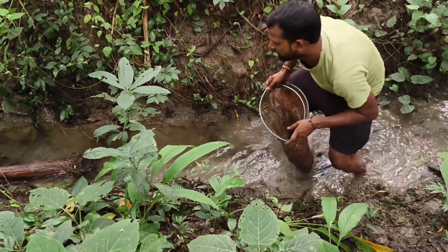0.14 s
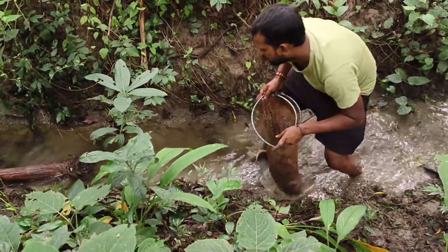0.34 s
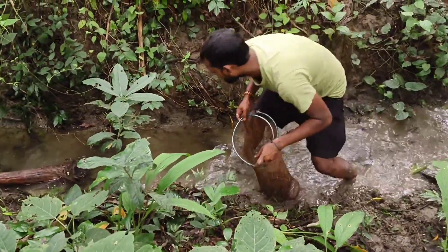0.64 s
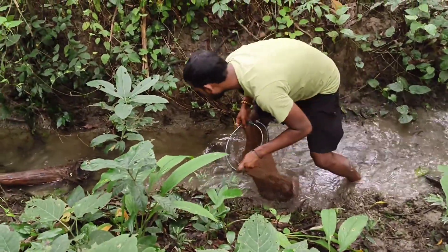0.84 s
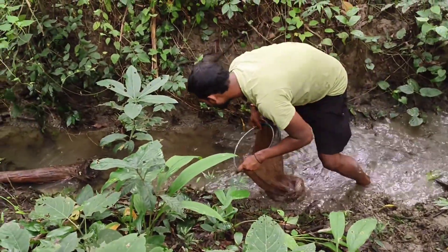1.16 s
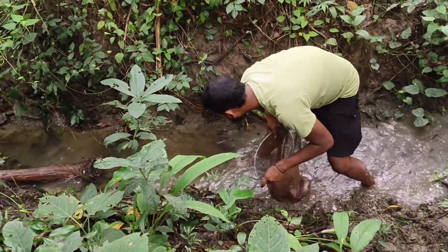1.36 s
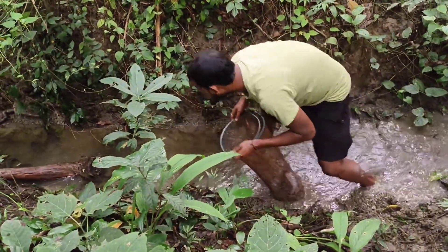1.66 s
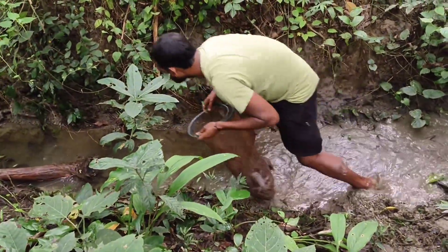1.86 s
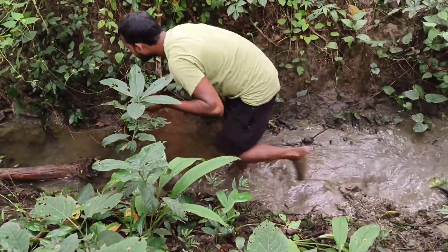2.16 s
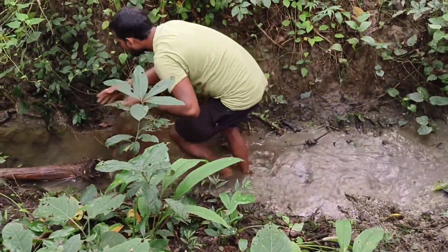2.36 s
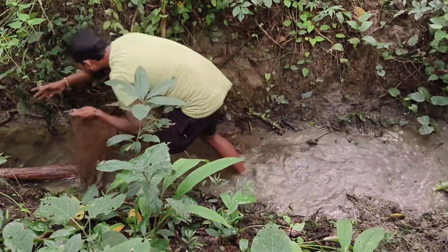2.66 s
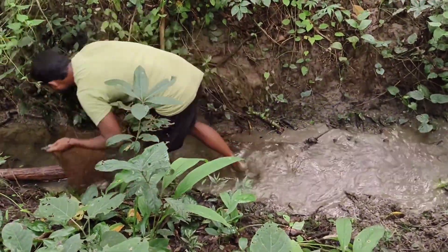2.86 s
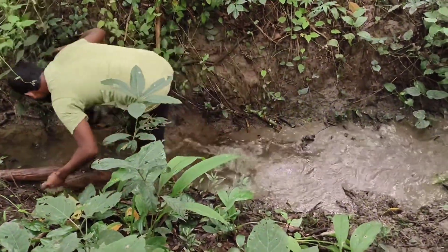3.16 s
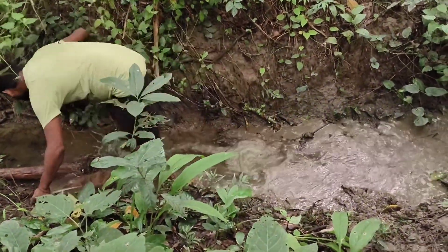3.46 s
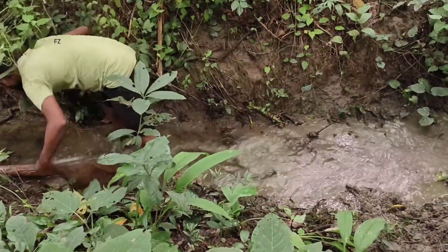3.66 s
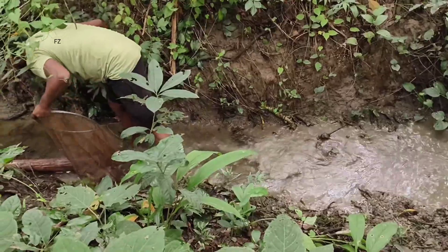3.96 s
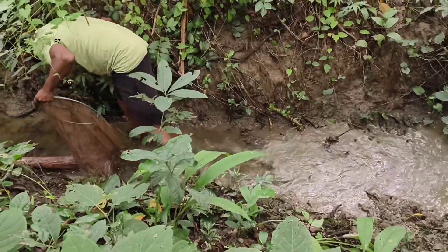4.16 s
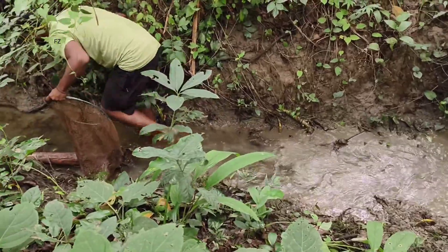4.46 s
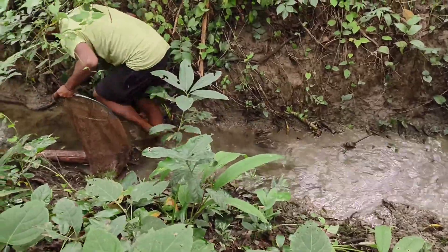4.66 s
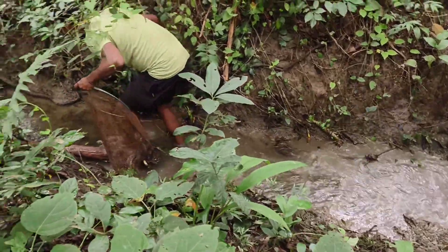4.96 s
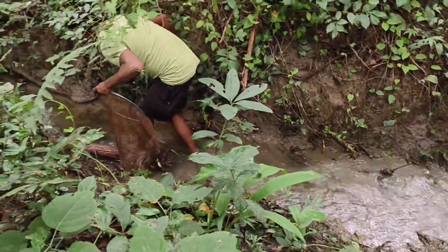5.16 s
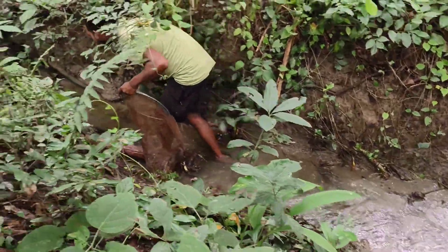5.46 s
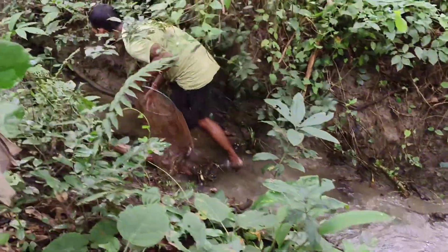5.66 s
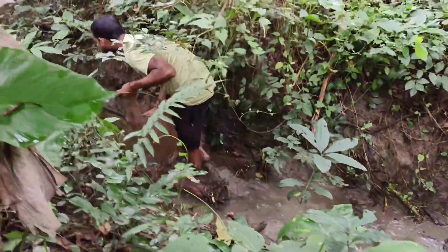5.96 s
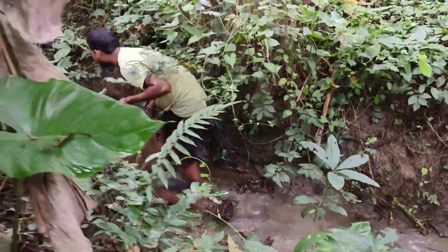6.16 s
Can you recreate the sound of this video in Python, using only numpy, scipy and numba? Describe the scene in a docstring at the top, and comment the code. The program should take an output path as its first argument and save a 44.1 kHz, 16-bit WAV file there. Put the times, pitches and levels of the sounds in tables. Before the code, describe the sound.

In a shallow forest stream, a wader scoops a hand net in short bursts: bubbly gurgles, hollow plops, sharp slaps and spray. Between bursts, water fizzes and drips from the mesh. Cicadas buzz without pause, mostly right and centre, over a low rumble and faint trickle. A distant bird hoots softly in the second half. Heard in stereo by a phone a few metres away.

```python
"""A shallow forest stream, a few metres from a phone: cicadas buzz, mostly from the right and centre,
over a low rumble, and the brook trickles throughout. Someone wades and scoops in bursts; between them water
drains from a hand net. Each stroke folds air under as ringing bubbles and throws spray and drops; pockets
plop, the surface smacks and slaps, fat drops plink off the net. In the second half a far bird hoots faintly.
Bubbles are decaying sines, cicadas click trains through body resonances, rumble and hiss filtered noise."""
import sys
import numpy as np
from scipy import signal
from scipy.fft import rfft, irfft, next_fast_len
from scipy.io import wavfile
from numba import njit

SR = 44100
rng = np.random.default_rng(int(sys.argv[2]) if len(sys.argv) > 2 else 0)


def log_audio(samples):
    """Write samples as a 16-bit WAV file to the path given in sys.argv[1]."""
    # one column per channel
    frames = np.atleast_2d(samples).T
    # limit to full scale, then quantise
    limited = np.clip(frames, -1, 1)
    pcm = np.round(limited * 32767).astype(np.int16)
    wavfile.write(sys.argv[1], SR, pcm)


N = 278271  # samples
TIME = np.arange(N) / SR  # s
TOP_HZ = 15600  # upper limit of the phone and of bubble pitches

# Low rumble under the whole place. Each row: frequency in Hz, relative level in dB.
RUMBLE = [(12, -78), (20, -28), (70, -2.5), (124, -4.5), (155, -9.5), (189, -6), (248, -11.5), (270, -15.5),
          (354, -21), (409, -32), (513, -51), (567, -65), (600, -59), (780, -61), (1320, -120)]
# Narrow drone within the rumble. Each row: frequency in Hz, relative level in dB.
DRONE = [(120, -46.5), (172, -10), (190, -5.5), (212, -13), (290, -43.5)]
# How loud the rumble stands over time. Each row: time in seconds, level in dB.
RUMBLE_LEVEL = [(0, -48), (1.6, -46.5), (2.2, -46), (3.2, -47.5), (4.7, -47), (5.4, -46.5), (6.3, -49.5)]
# Low murmur of the stream. Each row: frequency in Hz, relative level in dB.
MURMUR = [(30, -11), (150, -2), (300, 1), (450, -6), (800, -20), (3000, -66)]
# Hiss of the running stream. Each row: frequency in Hz, relative level in dB.
BROOK = [(300, 1), (550, 2.5), (1000, -4), (1800, -11), (3000, -16), (4500, -12), (6500, -5), (10000, -46),
         (11700, -17), (13500, 1.5), (15500, 1)]

# Click rates of the three nearest cicadas.
# Each row: time in seconds, then clicks per second of the first, second and third.
CICADA_RATE = [(0, 247.0, 269.9, 260.6), (1.9, 247.1, 270.2, 260.8), (2.4, 247.0, 271.2, 261),
               (3.7, 247.0, 271.7, 261.2), (4.5, 247.1, 272.5, 261), (6.3, 247.1, 272.8, 261.2)]
# How hard they sing. Each row: time in seconds, levels of the first, second and third in dB,
# level of the first one's strongest overtone in dB.
CICADA_EFFORT = [(0, -44.5, -41, -56, -45), (.5, -42.5, -45, -48, -55), (1.05, -46, -42, -54, -42),
                 (1.16, -46, -42, -47, -51), (1.3, -47.5, -43, -49, -53), (1.74, -49, -43, -45, -45),
                 (1.85, -44, -43, -49, -60), (2.6, -47, -43, -47, -49), (3.2, -48, -42.5, -50, -60),
                 (3.7, -52, -43.5, -50, -53), (4.3, -50.5, -43.5, -44, -50.5),
                 (5.0, -50.5, -43, -46.5, -51), (6.3, -47.5, -42, -50.5, -60)]
# Body resonances of the three. Each row: frequency in Hz, relative level in dB.
FIRST_BODY = [(5500, -50), (6600, -18), (7150, -7), (7400, -5), (7660, -5.5), (7900, -5.5), (8150, -6.5),
              (8400, -4), (8800, -20), (10500, -45)]
SECOND_BODY = [(5500, -50), (6700, -13), (7050, -7.5), (7600, -13), (8100, -7), (8350, -9), (8650, -2),
               (8950, 1), (9200, -5), (9450, -6.5), (10000, -11), (10800, -19), (12000, -42)]
THIRD_BODY = [(6000, -45), (7250, -7), (7550, -7), (7830, -1), (8090, -2), (8350, -3), (8850, -3),
              (9300, -18), (11000, -45)]
# Distant chorus of a lower and a higher kind. Each row: frequency in Hz, relative level in dB.
LOW_CHORUS = [(5000, -41.5), (6300, -8), (7100, 2.5), (8000, 8), (8800, 3.5), (10000, -40)]
HIGH_CHORUS = [(6000, -18.5), (7500, -31), (8900, 7), (9700, 6), (10500, -3), (11500, -42), (13000, -36)]
STRONGEST_OVERTONE = 33  # multiple of the click rate
LEAF_PATHS, LEAF_SWAY_PER_S = 3, 1.8

RIPPLE_DB = -64.5

# Water running off the lifted net or a leg.
# Each row: start in seconds, rise in seconds, length in seconds, level of the fizz in dB.
DRAINS = [(0.0, 0.0046, 0.022, -59.5), (1.006, .02, 0.37, -62.5), (2.286, 0.019, 0.27, -48),
          (3.82, 0.018, 0.15, -54.5), (4.017, 0.017, 0.057, -53), (4.17, 0.019, 0.42, -52),
          (4.573, 0.019, 0.14, -48), (4.957, 0.11, 0.59, -47), (5.623, 0.057, 0.32, -51.5)]
DRAIN_FALL_DB_PER_S = 73
DRAIN_DROPS_DB, DRAIN_GURGLE_DB, DRAIN_DRIPS_DB = -8, -10.5, -9.5  # relative to its fizz
# Pushes of a leg or the net through the water. Each row: start in seconds, rise in seconds,
# length in seconds, gurgle in dB, drops in dB, spray in dB, bubble pitch in Hz.
STROKES = [(0.259, 0.0066, 0.014, -50, -38.5, -42, 1030), (0.308, 0.032, 0.058, -40, -47.5, -49, 1160),
           (0.39, 0.02, 0.3, -43, -44.5, -49, 1080), (0.457, 0.023, 0.065, -46, -45, -45.5, 1070),
           (0.561, 0.008, 0.023, -39, -55, -37, 1130), (0.679, 0.004, 0.018, -42, -36, -39.5, 1020),
           (0.787, 0.02, 0.15, -58, -57, -56.5, 1000), (1.742, 0.023, 0.092, -59, -63, -71, 1450),
           (2.014, 0.053, 0.14, -43, -45.5, -49.5, 1084), (2.182, 0.038, 0.096, -40.5, -44, -45, 974),
           (2.613, 0.069, 0.16, -62, -44.5, -40, 935), (2.736, 0.017, 0.092, -43, -47.5, -45, 860),
           (2.844, 0.025, 0.14, -54, -47.5, -47.5, 1076), (3.039, 0.022, 0.047, -41.5, -41, -39.5, 900),
           (3.083, 0.02, 0.093, -35, -41.5, -44, 770), (3.184, 0.011, 0.15, -43, -46, -48, 1030),
           (3.352, 0.037, 0.08, -47, -39, -37, 1050), (3.435, 0.018, 0.22, -56, -47.5, -48, 950),
           (3.571, 0.0083, 0.033, -39, -35.5, -35.5, 830), (3.678, 0.024, 0.11, -54, -45, -46.5, 930),
           (4.262, 0.0028, 0.011, -45, -42, -47, 1110), (4.307, 0.031, 0.22, -44.5, -52.5, -59, 905),
           (4.527, 0.036, 0.088, -36.5, -42, -45.5, 950), (4.636, .01, 0.032, -39, -65, -62, 944),
           (5.131, 0.03, 0.1, -59, -47.5, -45.5, 725), (5.886, 0.008, 0.14, -51, -54, -54, 1326),
           (5.948, 0.03, 0.058, -35, -39.5, -40.5, 957), (6.04, 0.026, 0.14, -49.5, -47.5, -49, 1060),
           (6.195, 0.04, 0.042, -47, -33, -33, 1150), (6.267, 0.021, 0.046, -38, -39, -37, 810)]
GURGLE_FALL_DB_PER_S, DROPS_FALL_DB_PER_S, SPRAY_FALL_DB_PER_S = 235, 160, 239
DROPS_LATE_S = 0.0031  # drops land after the spray has flown
SURGE_DB, SURGE_PER_S = 1.5, 40  # the water heaves unevenly within a stroke
# Colours of gurgle, falling drops and spray. Each row: frequency in Hz, relative level in dB.
GURGLE = [(300, 2), (520, -42), (640, 3), (830, 1.5), (1050, 7), (1350, 5), (1800, 7), (2600, -1)]
DROPS = [(700, -12.5), (1400, -11.5), (2000, -9.5), (2600, -1.5), (3200, -6.5), (4200, -10.5), (8000, -30)]
SPRAY = [(1500, -11.5), (2900, -7.5), (3700, -2.5), (4400, 1), (5100, 3), (6500, -2.5), (9000, 1),
         (12000, -6.5), (15500, 1)]

# Single large air pockets closing.
# Each row: start in seconds, strength in dB before a common lift, starting pitch in Hz,
# time to decay by 60 dB in seconds.
PLOPS = [(0.002, -38, 1215, 0.054), (0.307, -38, 1370, 0.047), (0.333, -31, 340, 0.043),
         (0.357, -33.5, 346, 0.077), (0.371, -29.5, 835, 0.068), (0.373, -29, 1420, 0.039),
         (0.429, -32, 1680, 0.029), (0.478, -38, 940, 0.038), (0.542, -38, 1120, 0.025),
         (0.613, -29, 1210, 0.025), (0.634, -37, 830, 0.03), (0.67, -30, 1410, 0.026),
         (0.569, -31.5, 1610, 0.04), (0.61, -33, 816, 0.054), (0.682, -18.5, 1002, 0.029),
         (0.718, -33, 945, 0.039), (0.777, -38, 1110, 0.028), (0.792, -41, 865, 0.046),
         (0.814, -32.5, 930, 0.032), (0.839, -42, 1040, 0.05), (0.917, -42.5, 1090, 0.033),
         (1.221, -54, 1620, 0.019), (1.316, -50, 1070, 0.018), (1.432, -48, 1230, 0.018),
         (1.819, -46, 1460, 0.028), (1.841, -48, 1700, 0.035), (2.043, -42, 1106, 0.12),
         (2.074, -31.5, 1066, 0.047), (2.2, -41, 1070, 0.035), (2.243, -21.5, 1040, 0.031),
         (2.28, -37, 912, 0.084), (2.421, -37, 1120, 0.032), (2.73, -19, 800, 0.015),
         (2.773, -35, 790, 0.024), (2.795, -24, 790, 0.022), (2.801, -28.5, 1580, 0.037),
         (2.88, -30.5, 1430, 0.025), (2.908, -39.5, 926, 0.082), (2.928, -36, 940, 0.033),
         (2.98, -36.5, 845, 0.035), (3.037, -44, 1100, 0.05), (3.096, -25.5, 800, 0.032),
         (3.115, -28, 722, 0.081), (3.141, -28, 750, 0.022), (3.151, -23.5, 772, 0.029),
         (3.203, -35, 950, 0.043), (3.228, -38, 800, 0.035), (3.288, -36, 1250, 0.04),
         (3.294, -31.5, 1620, 0.04), (3.374, -30, 1380, 0.021), (3.507, -30.5, 780, 0.054),
         (3.602, -11.5, 800, 0.018), (3.708, -28.5, 1250, 0.071), (3.773, -35.5, 817, 0.043),
         (3.861, -40, 874, 0.035), (3.915, -47.5, 690, 0.09), (4.067, -34.5, 966, 0.018),
         (4.302, -34.5, 780, 0.033), (4.318, -31, 1230, 0.028), (4.327, -38, 898, 0.072),
         (4.346, -27, 938, 0.047), (4.365, -37, 1000, 0.033), (4.404, -33.5, 916, 0.063),
         (4.439, -28, 820, 0.034), (4.482, -34, 2290, 0.036), (4.548, -36.5, 890, 0.084),
         (4.566, -23, 1020, 0.017), (4.633, -24.5, 740, 0.033), (4.653, -24, 745, 0.026),
         (4.717, -33, 970, 0.044), (5.168, -38, 613, 0.034), (5.884, -42, 1460, 0.1),
         (5.956, -33.5, 1080, 0.038), (5.988, -39, 1070, 0.062), (6.004, -26.5, 753, 0.069),
         (6.286, -31.5, 815, 0.036)]
# Hard smacks of a foot or the net's rim on the surface.
# Each row: start in seconds, strength in dB before a common trim, centre pitch in Hz.
SMACKS = [(0.2724, -19, 3000), (0.371, -27, 1200), (0.6892, -16.5, 2220), (2.1931, -17.5, 4230),
          (2.7312, -20, 1510), (3.1165, -22, 1310), (3.6022, -10, 1400), (3.611, -22, 2600),
          (3.6335, -35, 2200), (4.2685, -16, 2580), (4.5663, -37, 1410), (4.633, -16, 1510),
          (5.1728, -26, 2800), (6.0074, -18, 1920), (6.0905, -21, 3180), (6.2364, -22, 2250)]
SMACK_CYCLES = 1.77  # to decay by 60 dB
# A small patch of water radiates little bass. Each row: frequency in Hz, gain in dB.
SMACK_HEARD = [(250, -27), (520, -28), (680, -4.5), (8000, -11)]
# Slaps on the surface, from a hard tick to a wet smack.
# Each row: start in seconds, strength in dB, starting pitch in Hz, cycles to decay by 60 dB,
# strength of the droplets in dB before their own trim.
SLAPS = [(0.2746, -35, 2160, 7.3, -19), (0.523, -29, 2550, 50, -33), (0.528, -13, 4500, 19, -20),
         (0.585, -24, 3660, 14, -16), (0.6896, -8.5, 3560, 28, -8.5), (0.698, -19, 2730, 52, -29),
         (2.1931, -10.5, 4770, 20, -31), (2.2805, -17.5, 4930, 19, -31), (2.4917, -27, 4900, 20, -21),
         (2.5547, -38, 4700, 20, -19.5), (2.6936, -13, 4800, 5.2, -11), (2.7297, -24, 5300, 12, -11),
         (2.759, -11, 5100, 11, -23), (3.0475, -19, 2630, 19, -28), (3.2246, -10, 3660, 15, -18),
         (3.3877, -14, 2950, 21, -36), (3.4132, -17, 4840, 16, -9), (3.5848, -15, 4200, 26, -17),
         (3.6017, -12, 4860, 21, -8), (3.634, -23, 2000, 10, -40), (3.7534, -29, 2320, 16, -29),
         (4.2680, -33, 2730, 9.7, -14.5), (4.3425, -25, 4720, 45, -21), (4.4076, -23, 5470, 93, -33),
         (4.6329, -13, 3680, 21, -33), (5.174, -17, 4060, 18, -33), (5.238, -25, 4860, 20, -17),
         (5.7174, -22, 4940, 14, -26), (5.9484, -6, 4340, 13, -11.5), (6.0898, -19, 2670, 13, -18.5),
         (6.2208, -18, 2650, 26, -37), (6.2338, -11, 2600, 13, -9)]
BURST_T60_S = .08  # droplets are spread over half of this
# Fat drops off the lifted net. Each row: start in seconds, strength in dB, starting pitch in Hz.
PLINKS = [(0.893, -35.5, 2660), (0.936, -36.5, 2520), (1.072, -46, 2270), (1.25, -35, 4900),
          (1.294, -40, 2590), (1.763, -43, 4500), (1.87, -39.5, 4500), (1.956, -41, 5560),
          (2.667, -35, 2770), (2.928, -32, 2520), (3.305, -31, 2920), (3.851, -31.5, 4750),
          (3.955, -34.5, 3700), (4.756, -40, 2630), (4.788, -42, 2510)]
PLINK_CYCLES = 140  # to decay by 60 dB
PLINK_SPLATTER_DB = 4  # tiny droplets thrown up, relative to the drop and before their own trim
FAR_EAR_LAG_S = .00015  # the water reaches the right ear later

# Hoots of a far bird. Each row: start in seconds, length in seconds, top pitch in Hz, level in dB.
HOOTS = [(3.8, .42, 736, -67), (4.6, .4, 735, -62), (5.3, .38, 716, -61.5), (6.04, .42, 735, -64.5)]


def undb(db):
    """Decibels to gain."""
    return 10 ** (np.asarray(db) / 20)


def level(x, db):
    """Scale to an rms level."""
    return x * undb(db) / np.sqrt(np.mean(x ** 2))


def curves(table):
    """The columns of a table, joined by straight lines in time."""
    s, *columns = np.transpose(table)
    return [np.interp(TIME, s, column) for column in columns]


def pan(left_db):
    """Gains of the two channels for a left-minus-right level."""
    return undb(np.array([[left_db], [-left_db]]) / 2)


def noise(channels):
    """White noise, independent in each channel."""
    return rng.standard_normal((channels, N))


def colour(x, points):
    """Causal minimum-phase filter with a spectrum of (Hz, dB) points."""
    hz, db = np.transpose(points)
    size = next_fast_len((N + SR // 2) // 2, True) * 2
    f = np.maximum(np.arange(size // 2 + 1) * SR / size, 1)
    gain = undb(np.interp(np.log(f), np.log(hz), db))
    cepstrum = irfft(np.log(gain))
    # folding the cepstrum onto positive time makes the filter causal
    cepstrum[1:size // 2] *= 2
    cepstrum[size // 2 + 1:] = 0
    return irfft(rfft(x, size) * np.exp(rfft(cepstrum)))[..., :N]


def walk(rate):
    """A smooth random drift with about rate turns a second; spread near 1."""
    knots = rng.standard_normal(1000)
    return 1.2 * np.interp(TIME * rate, np.arange(len(knots)), knots)


def scatter(x, t60, wet_db):
    """Mud banks and leaves return a short, diffuse echo, different at each ear."""
    t = TIME[:int(t60 * SR)]
    build_up = 1 - np.exp(-t / 0.0049)
    tail = rng.standard_normal((2, len(t))) * undb(-60 * t / t60) * build_up
    tail /= np.sqrt(np.sum(tail ** 2, axis=1, keepdims=True))
    echo = signal.oaconvolve(np.atleast_2d(x), tail, axes=1)[:, :N]
    return x + undb(wet_db) * echo


@njit
def ring(start, hz, t60, size, side, rise):
    """Bubbles: decaying sines that climb as they near the surface; side sets level and lag between the ears."""
    out = np.zeros((2, N))
    for k in range(len(start)):
        pole = (2j * np.pi * hz[k] - np.log(1000) / t60[k]) / SR
        glide = np.exp(2j * np.pi * hz[k] * rise / (t60[k] * SR * SR))
        closing = np.exp(-max(1.2 * hz[k], 30 / t60[k]) / SR)
        for c in range(2):
            lean = side[k] * (1 - 2 * c)
            onset = (start[k] - lean * 2e-4) * SR
            first = max(int(onset) + 1, 0)
            z = size[k] * (1 + .4 * lean) * np.exp(pole * (first - onset))
            step = np.exp(pole)
            still_open = closing ** (first - onset)
            for i in range(first, min(int(onset + t60[k] * SR), N)):
                out[c, i] += (1 - still_open) * z.imag
                z *= step
                step *= glide
                still_open *= closing
    return out


def cloud(low_hz, high_hz, cycles, spread_db, rise, width, count):
    """Bubbles of random pitch between two bounds (which may move), many small and a few large, at unit level."""
    when, pitch, rank, length, side = rng.random((count, 5)).T
    index = (when * N).astype(int)
    low = np.broadcast_to(low_hz, N)[index]
    high = np.broadcast_to(high_hz, N)[index]
    hz = low * (np.minimum(high, TOP_HZ) / low) ** pitch
    size = undb(-spread_db * np.log(rank + 1 / 50)) * np.sqrt(hz)
    t60 = cycles * (.5 + length) / hz
    return level(ring(when * N / SR, hz, t60, size, width * (2 * side - 1), rise), 0)


def burst(s, db, hz):
    """Droplets around each given pitch that thin out and fade after an impact."""
    age, pitch, size, side = rng.random((len(s), 30, 4)).transpose(2, 1, 0)
    age = age ** 2  # most droplets land in the first moments
    start = s + age * BURST_T60_S / 2
    drop_hz = np.minimum(hz * 1.9 ** (2 * pitch - 1), TOP_HZ)
    drop_db = db - 11.0 - 30 * age - 11 * size
    return ring(start.ravel(), drop_hz.ravel(), (26 / drop_hz).ravel(), undb(drop_db).ravel(),
                2 * side.ravel() - 1, 1.0)


def swells(starts, rises, lengths, levels_db, fall_db_per_s):
    """Gain of events that each rise, hold to the end of their length and die away; overlaps add in power."""
    power = np.zeros(N)
    for s, rise, length, db in np.broadcast(starts, rises, lengths, levels_db):
        first = np.searchsorted(TIME, s, "right")
        age = TIME[first:first + SR] - s
        fall_db = fall_db_per_s * np.maximum(age - length, 0)
        gain = np.minimum(age / rise, 1) * undb(db - fall_db)
        power[first:first + SR] += gain ** 2
    return np.sqrt(power)


def background():
    """Low rumble with a wavering drone, nearly alike at both ears; faint murmur to the left, and stream hiss."""
    rumble = level(colour(noise(1), RUMBLE), -0.69) * undb(0.23 * walk(4.09))
    drone = level(colour(noise(1), DRONE), -10.5) * undb(3.2 * walk(2.3))
    rumble_db, = curves(RUMBLE_LEVEL)
    murmur = level(colour(noise(2), MURMUR), -58.0) * pan(7.1)
    brook = level(colour(noise(2), BROOK), -52.5) * undb(0.2 * walk(2.3))
    return (rumble + drone) * undb(rumble_db) * pan(0.93) + murmur + brook


def cicada(rate, body, jitter):
    """A nearly regular train of tymbal clicks rings the body; swaying leaves make its overtones come and go."""
    phase = np.pi * np.cumsum(rate * (1 + jitter * walk(30))) / SR
    clicks = np.sin(101 * phase) / np.sin(phase)  # 50 equal overtones
    song = colour(clicks, body)
    shares = np.array([walk(LEAF_SWAY_PER_S) for _ in range(LEAF_PATHS)])
    shares /= np.sqrt(np.sum(shares ** 2, axis=0))
    # most of the song arrives by leaf echoes whose shares drift
    echoes = sum(share * (scatter(song, t60=.45, wet_db=0) - song) for share in shares)
    return level(.25 * song + echoes, 0)


def cicadas():
    """Three near singers over a shimmering chorus; the first sits to the right and whistles on one overtone."""
    first_hz, second_hz, third_hz = curves(CICADA_RATE)
    first_db, second_db, third_db, overtone_db = curves(CICADA_EFFORT)
    first = cicada(first_hz, FIRST_BODY, jitter=.0011) * undb(first_db) * pan(-7)
    second = cicada(second_hz, SECOND_BODY, jitter=.0025) * undb(second_db) * pan(-1)
    third = cicada(third_hz, THIRD_BODY, jitter=.003) * undb(third_db) * pan(-4)
    phase = 2 * np.pi * STRONGEST_OVERTONE * np.cumsum(first_hz * (1 + .0003 * walk(30))) / SR
    ear_drift = .5 * np.array([walk(3), walk(3)])  # radians, separate at each ear
    whistle = level(np.sin(phase + ear_drift), 0) * undb(overtone_db) * pan(-6)
    low = level(colour(noise(2), LOW_CHORUS), -48.5) * pan(-7)
    high = level(colour(noise(2), HIGH_CHORUS), -51)
    first_singer = (first + whistle) * undb(.7 * walk(25))
    second_singer = second * undb(.8 * walk(25))
    chorus = (low + high) * undb(.8 * walk(70))
    return first_singer + second_singer + third + chorus


def ripples():
    """The running stream trickles in fits, closing small bubbles and flicking up tiny drips."""
    trickle = cloud(750, 2600, cycles=26, spread_db=3.3, rise=.15, width=1., count=450)
    flicks = cloud(2200, 6000, cycles=30, spread_db=3.6, rise=.15, width=1., count=350)
    trickle = trickle * undb(4 * walk(9))
    flicks = flicks * undb(4 * walk(7))
    return level(trickle + 0.66 * flicks, RIPPLE_DB)


def spray():
    """Fine spray and water draining through the mesh: a dense wash of tiny bubbles and ticks, a little right."""
    fizz = cloud(3000, 7000, cycles=36, spread_db=3., rise=.08, width=1., count=6500)
    ticks = cloud(2500, 15000, cycles=5, spread_db=3.3, rise=0., width=1., count=17000)
    return level(colour(fizz + ticks, SPRAY), 0.35) * pan(-3.5)


def drops():
    """Drops fall back thickly from net and legs: ticks on the surface among ringing trapped bubbles."""
    plips = cloud(1300, 3900, cycles=36, spread_db=3.2, rise=.12, width=1., count=3400)
    ticks = cloud(1100, 4200, cycles=6, spread_db=3.6, rise=0., width=1., count=6000)
    return level(colour(plips + .7 * ticks, DROPS), -1.17)


def gurgle(hz):
    """Air folded under by legs and net rings as a crowd of large bubbles, many near one moving pitch."""
    typical = cloud(.78 * hz, 1.17 * hz, cycles=32, spread_db=2.5, rise=.18, width=.6, count=900)
    stray = cloud(560, 2000, cycles=24, spread_db=3.4, rise=.15, width=1., count=1200)
    return level(colour(typical + undb(0.5) * stray, GURGLE), -5.0)


def drips():
    """Lone drips from the wet mesh, each a short plink."""
    return cloud(1977, 5200, cycles=110, spread_db=4, rise=0.21, width=0.96, count=300)


def stirred_water():
    """Strokes gurgle and throw spray and drops, each surging by itself; draining water fizzes and drips."""
    drain = swells(*np.transpose(DRAINS), DRAIN_FALL_DB_PER_S)
    s, rise, length, gurgle_db, drops_db, spray_db, hz = np.transpose(STROKES)
    folded = swells(s, rise, length, gurgle_db, GURGLE_FALL_DB_PER_S)
    falling = swells(s + DROPS_LATE_S, rise, length, drops_db, DROPS_FALL_DB_PER_S)
    flying = swells(s, rise, length, spray_db, SPRAY_FALL_DB_PER_S)
    bubble_hz = np.interp(TIME, s + length / 2, hz)
    layers = (gurgle(bubble_hz) * np.hypot(folded, drain * undb(DRAIN_GURGLE_DB)),
              drops() * np.hypot(falling, drain * undb(DRAIN_DROPS_DB)),
              spray() * np.hypot(flying, drain),
              drips() * drain * undb(DRAIN_DRIPS_DB))
    return sum(layer * undb(SURGE_DB * walk(SURGE_PER_S)) for layer in layers)


def plops():
    """An air pocket closes and rings; quieter bubbles pinch off after it, and the biggest pockets also thump."""
    s, db, hz, t60 = np.transpose(PLOPS)
    t60 = np.maximum(t60, .005)
    centre = np.zeros(len(s))
    out = ring(s, hz, t60, undb(db + 1.5), centre, 0.12)
    # doubled dB: the thump sinks fast with the size of the pocket
    out += ring(s, centre + 210, centre + 0.049, undb(2 * db - 5.0), centre, 0.13)
    for delay, pitch, side in rng.random((3, len(s), 3)).transpose(0, 2, 1):
        small_hz = hz * 1.5 ** (2 * pitch - 1)
        out += ring(s + .016 * delay, small_hz, .5 * t60, undb(db - 12), 2 * side - 1, .25)
    return out


def smacks():
    """A flat blow on the water gives one broad crack, over within a few cycles."""
    s, db, hz = np.transpose(SMACKS)
    centre = np.zeros(len(s))
    cracks = np.zeros((2, N))
    for ratio in (.5, 1, 2):  # an octave below, at and above the centre
        crack_hz = hz * ratio
        cracks += ring(s, crack_hz, SMACK_CYCLES / crack_hz, undb(db - 1.5), centre, 0.)
    return colour(cracks, SMACK_HEARD)


def slaps():
    """The struck surface cracks and rings a small bubble, then droplets thin out and fade."""
    s, db, hz, cycles, droplets_db = np.transpose(SLAPS)
    bubble = ring(s, hz, np.maximum(cycles, 2) / hz, undb(db), np.zeros(len(s)), 0.04)
    return bubble + burst(s, droplets_db, hz)


def plinks():
    """A fat drop splatters and traps one small bubble, which rings and climbs a little."""
    s, db, hz = np.transpose(PLINKS)
    bubble = ring(s, hz, PLINK_CYCLES / hz, undb(db), np.zeros(len(s)), 0.27)
    return bubble + burst(s, db + PLINK_SPLATTER_DB, hz)


def bird():
    """Each hoot is a soft tone that holds its pitch and sags at the end, wavering and blurred by the trees."""
    out = np.zeros(N)
    waver = 1 + .004 * walk(45)
    for s, length, hz, db in HOOTS:
        age = np.clip((TIME - s) / length, 0, 1)  # 0 to 1 through the hoot
        pitch = hz * waver * (1 - .135 * age ** 4)
        swell = np.sqrt(4 * age ** 1.5 * (1 - age))
        out += undb(db) * swell * np.sin(2 * np.pi * np.cumsum(pitch) / SR)
    return scatter(out * undb(1.8 * walk(24)), t60=.4, wet_db=-6)


def scene():
    """The stirred water between its banks, reaching the left ear first, amid the forest."""
    left, right = ripples() + stirred_water() + plops() + smacks() + slaps() + plinks()
    late_right = np.pad(right, (int(FAR_EAR_LAG_S * SR), 0))[:N]
    stream = scatter(np.array([left, late_right]), t60=0.12, wet_db=-4)
    return background() + cicadas() + stream + bird()


def record(dry):
    """The phone cuts the top with a steep low-pass."""
    return signal.sosfilt(signal.ellip(12, .2, 70, TOP_HZ, fs=SR, output="sos"), dry)


dry = scene()
out = record(dry)
log_audio(out)
```